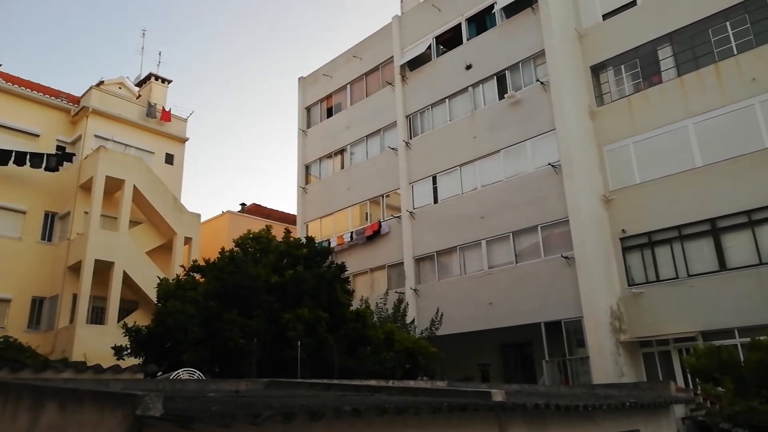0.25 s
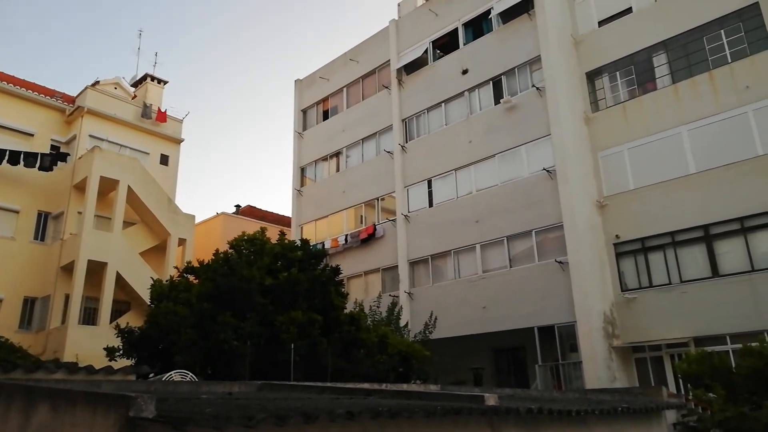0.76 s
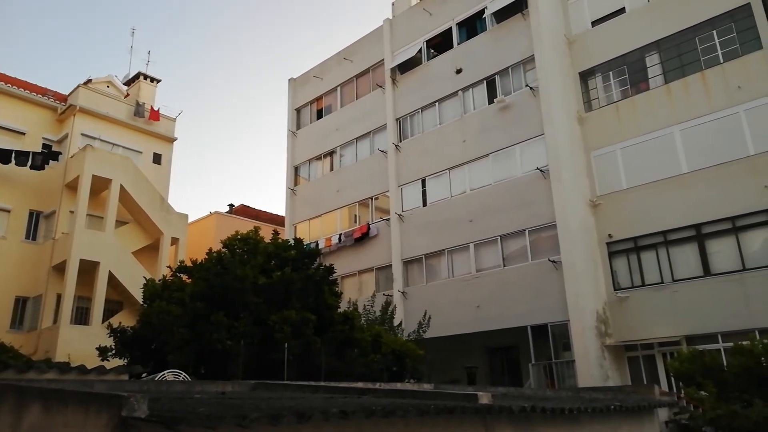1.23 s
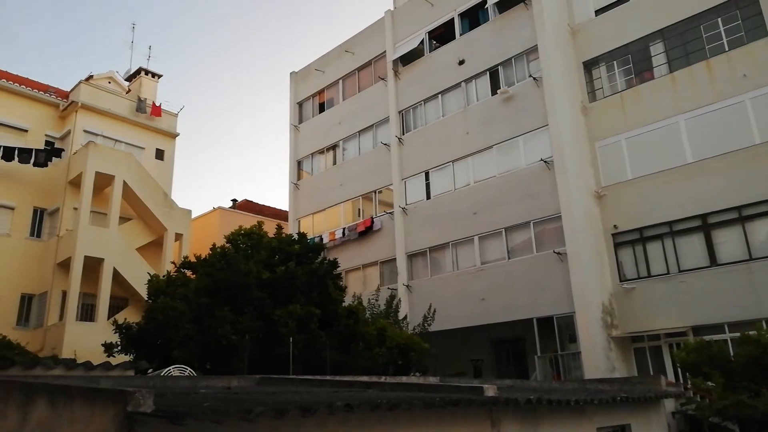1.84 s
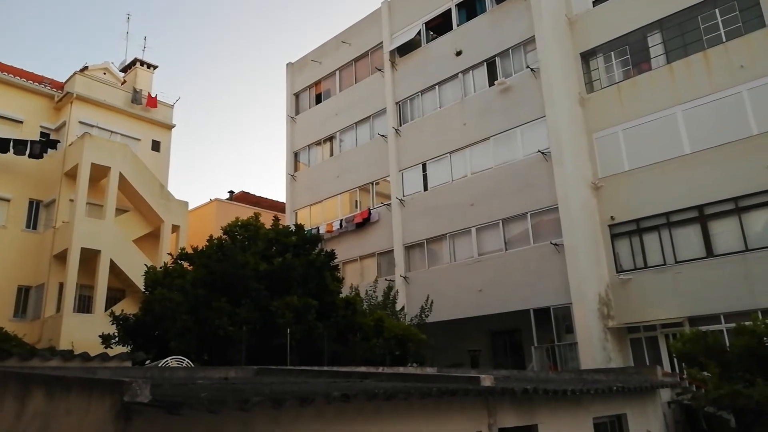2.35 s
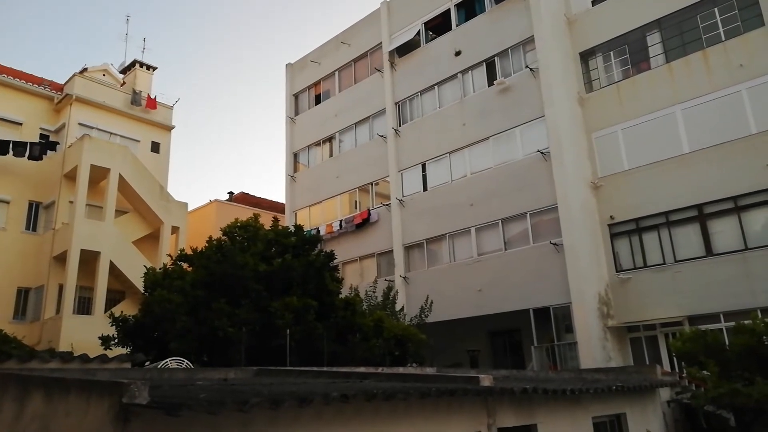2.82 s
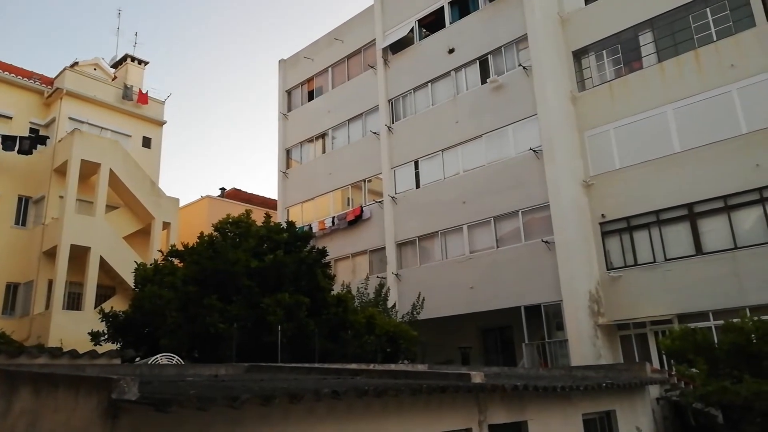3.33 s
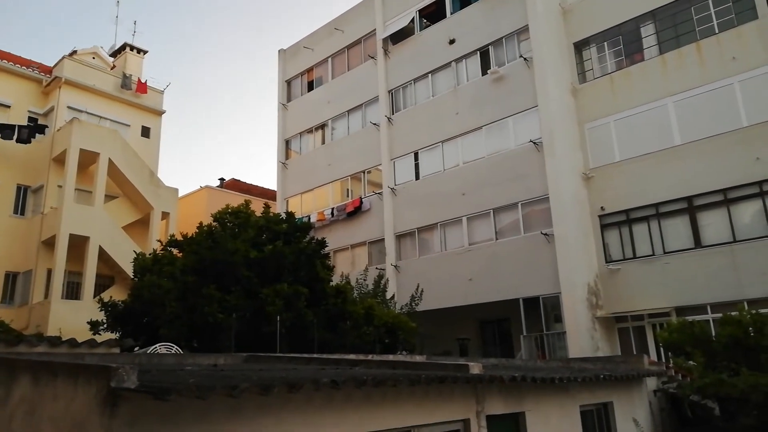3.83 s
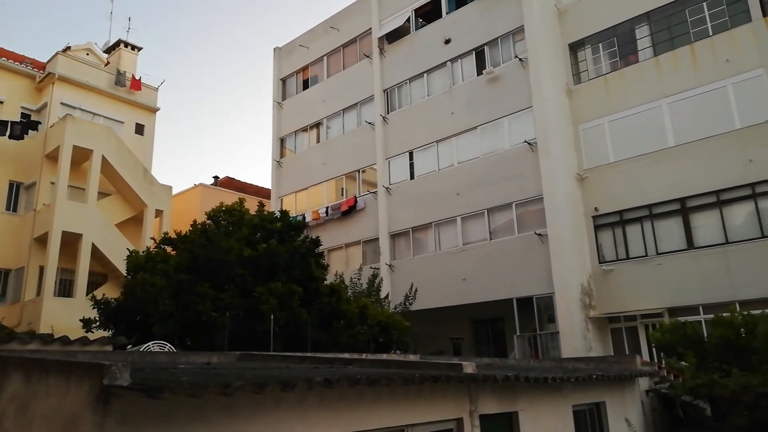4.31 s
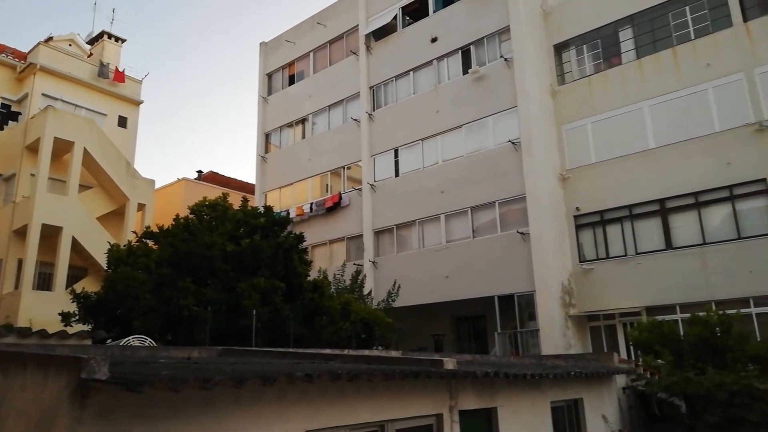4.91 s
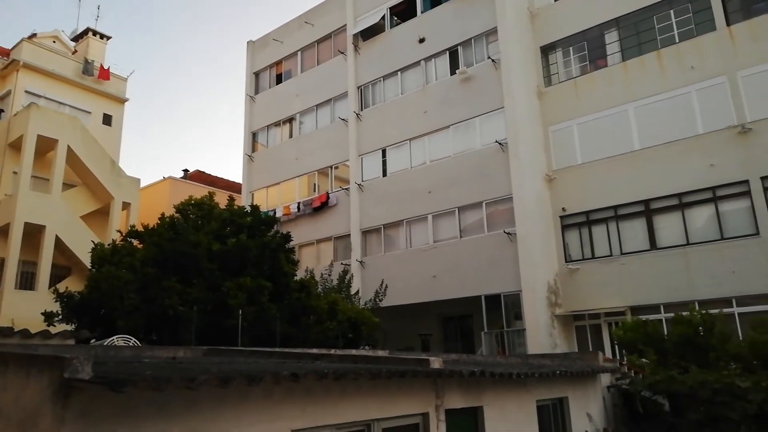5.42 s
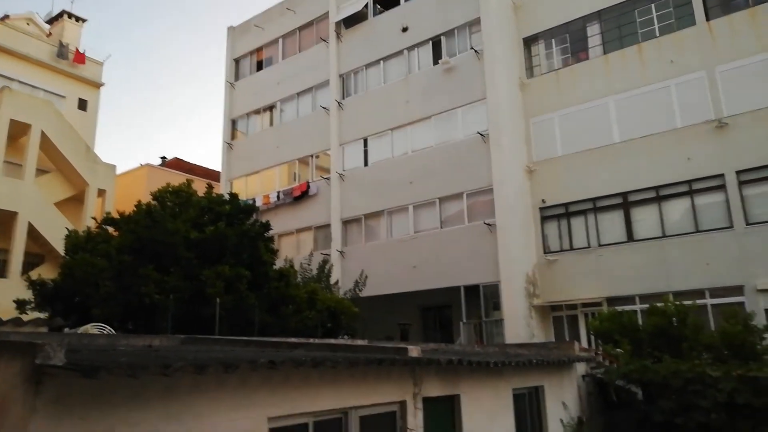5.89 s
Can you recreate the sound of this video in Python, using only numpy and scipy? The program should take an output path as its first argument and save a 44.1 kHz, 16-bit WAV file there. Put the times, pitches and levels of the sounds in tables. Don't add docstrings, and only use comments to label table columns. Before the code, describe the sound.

Sharp, short sparrow chirps ring around an echoing courtyard, with fainter birds blurred behind and a low steady traffic hum beneath.

```python
import sys
import numpy as np
from scipy import signal
from scipy.fft import rfft, irfft
from scipy.io import wavfile
from scipy.ndimage import uniform_filter1d

SR = 44100
rng = np.random.default_rng(int(sys.argv[2]) if len(sys.argv) > 2 else 0)


def rack_gain(trim_db):
    fader = np.asarray(trim_db, float)
    return 10 ** (fader / 20)


def wav_out(sig):
    wavfile.write(sys.argv[1], SR, np.round(np.clip(np.atleast_2d(sig).T, -1, 1) * 32767).astype(np.int16))


N = 271215


def at_hz(points, hz, column=1):
    points = np.array(points, float)
    return np.interp(np.log(hz + 1), np.log(points[:, 0]), points[:, column])


def band_pass(sound, low_hz, high_hz):
    return signal.sosfilt(signal.butter(2, [low_hz, high_hz], "band", fs=SR, output="sos"), sound)


def wander(count, rate_hz):
    r = np.exp(-2 * np.pi * rate_hz / SR)
    noise = rng.standard_normal(max(count, 12000) + 1000)
    slow = signal.lfilter([1], [1, -2 * r, r * r], noise)[1000:]
    return slow[:count] / slow.std()


def rasp(count, width_hz):
    low_pass = signal.butter(2, width_hz, fs=SR, output="sos")
    fast = signal.sosfilt(low_pass, rng.standard_normal(12000))[200:]
    return fast[:count] / fast.std()


def breath(count):
    return rasp(count, 3200) * np.sin(2 * np.pi * 9500 * np.arange(count) / SR)


def add(track, sound, start_s):
    i = round(start_s * SR)
    track[i:i + len(sound)] += sound[:max(N - i, 0)]


# pitch_hz, likeness (1 same, 0 unrelated)
LIKENESS = [(25, .998), (60, .995), (130, 0.98), (290, 0.78), (640, -0.55), (1400, .06), (3000, -0.05)]
# pitch_hz, left_minus_right_db
LEAN = [(200, 0), (500, -1.8), (1300, -1.3), (5000, -.5), (9000, 1.5), (15000, -.5)]


def ambience(spectrum, level_db, patchy_db):
    hz = np.fft.rfftfreq(N, 1 / SR)
    mid, side = rfft(rng.standard_normal((2, N))) * rack_gain(at_hz(spectrum, hz))
    alike = np.clip(at_hz(LIKENESS, hz), -1, 1)
    mid = mid * np.sqrt(1 + alike)
    side = side * np.sqrt(1 - alike)
    lean = rack_gain(at_hz(LEAN, hz) / 2)
    noise = irfft(np.array([(mid + side) * lean, (mid - side) / lean]), N)
    return rack_gain(level_db + patchy_db * wander(N, 4.1)) * noise / noise.mean(0).std()


# pitch_hz, level_db (per Hz)
RUMBLE = [(12, -50), (20, -16), (59, -1), (103, -0.5), (136, -2), (166, -9), (202, -3.5), (263, -12.5),
          (298, -11.5), (356, -14.5), (389, -10.5), (473, -17.5), (836, -18), (981, -18.5), (1400, -29.5),
          (1820, -64), (3080, -120)]


def city_rumble():
    return ambience(RUMBLE, level_db=-58.5, patchy_db=0.3)


# pitch_hz, level_db (per Hz)
AIR = [(710, -20), (1200, -7), (2220, -9.5), (2440, -8), (2880, -4), (3070, -6), (3450, 1), (4220, -2.5),
       (5380, -9.5), (6040, -12.5), (7470, -11.5), (8390, -13.5), (15000, -11.5)]


def distant_chorus():
    return ambience(AIR, level_db=-63.5, patchy_db=0.51)


def chirp(shape, tilt_db, wobble_hz, flutter_db):
    ms, hz, level_db, over_db = np.transpose(shape)
    t = np.arange(ms[0], ms[-1], 1000 / SR)
    count = len(t)
    path = np.interp(t, ms, hz)
    jump = uniform_filter1d(np.abs(np.gradient(path)) * SR / 1000, size=60)
    pitch = path + wobble_hz * wander(count, 230)
    phase = 2 * np.pi * np.cumsum(pitch) / SR
    overtones = np.zeros(count)
    for k, db in [(2, -3.5), (3, -3.0), (4, -18.0)]:
        overtones += rack_gain(db) * np.sin(k * phase) * (k * pitch < .4 * SR)
    overtones = overtones * (0.35 + rasp(count, 590)) + rack_gain(-1.0) * breath(count)
    choke = rack_gain(-np.minimum(0.012 * jump, 9.0))
    voice = np.sin(phase) * (1 + 0.38 * rasp(count, 560)) * choke
    voice *= rack_gain(tilt_db * (path - 4000) / 1000)
    voice += rack_gain(np.interp(t, ms, over_db)) * overtones
    voice *= np.minimum((t - ms[0]) / 7, 1) ** 2
    return voice * rack_gain(np.interp(t, ms, level_db) + flutter_db * wander(count, 86))


def bird(calls, shapes, wobble_hz=120, flutter_db=3.0):
    track = np.zeros(N)
    for start_s, level_db, tilt_db in calls:
        for shape in shapes:
            sound = rack_gain(level_db) * chirp(shape, tilt_db, wobble_hz, flutter_db)
            add(track, sound, start_s + shape[0][0] / 1000)
    return track


def stair(top_hz, first_ms, note_ms, slide_ms, loss_db, count=4):
    starts = [0] + [first_ms + slide_ms + k * note_ms for k in range(count - 1)]
    held_ms = note_ms - slide_ms
    holds = [first_ms] + [held_ms] * (count - 2) + [held_ms / 2]
    levels = [-4] + [-loss_db * k ** 2 for k in range(count - 1)]
    pitches = [top_hz * .826 ** k for k in range(count)]
    return [(ms, max(hold, 1), hz, db) for ms, hold, hz, db in zip(starts, holds, pitches, levels)]


def notes(pitches, rows):
    return [(ms, hold, hz, db) for hz, (ms, hold, db) in zip(pitches, rows)]


def phrase(held, over_db, over_db_per_ms, scoop=1.08, sag=.86, attack_ms=6.0, release_ms=31.4):
    rows = [(ms + end, hz, db) for ms, hold, hz, db in held for end in (0, hold)]
    ms, hz, db = rows[0]
    last_ms, last_hz, last_db = rows[-1]
    start = (ms - attack_ms, hz * scoop, db + 1)
    finish = (last_ms + release_ms, last_hz * sag, last_db - 28)
    return [(ms, hz, db, over_db + over_db_per_ms * ms) for ms, hz, db in [start] + rows + [finish]]


# delay_ms, left_db, right_db
ECHOES = [
    (9.156, 3, -21),
    (21.5, -1, -17),
    (34.86, -28, -1.5),
    (46, -6, -23),
    (59.5, -7, -28),
    (78.8, -36, -42),
    (91.5, -28, -6.5),
]
# pitch_hz, fade_s
YARD_FADE = [(2000, 0.57), (4000, 0.67), (7000, 0.53), (11000, 0.37), (15000, 0.038)]


def yard(track, direct_db, left_lag, echoes, tail_db, build_s):
    t = np.arange(SR * 3 // 4) / SR
    edges = np.geomspace(1000, 16000, 9)
    tail = 0
    for low, high in zip(edges, edges[1:]):
        band = band_pass(rng.standard_normal((2, len(t))), low, high)
        fade_s = at_hz(YARD_FADE, np.sqrt(low * high))
        tail = tail + band * rack_gain(-60 * (t / fade_s) ** 1.126)
    response = rack_gain(tail_db) * tail * (1 - np.exp(-(t / build_s) ** 2))
    response += rack_gain(-19.0 - 60 * t / 0.041) * rng.standard_normal(tail.shape)
    lags = [max(left_lag, 0), max(-left_lag, 0)]
    for side in range(2):
        response[side, round(lags[side])] += rack_gain(direct_db[side])
        for ms, *level_db in echoes:
            taps = round(ms * SR / 1000) + rng.integers(0, 60, 3)
            response[side, taps] += rack_gain(level_db[side] - 7.0) * rng.choice([-1, 1], 3)
    return signal.fftconvolve(track[None], response, axes=1)[:, :N]


# start_s, level_db, tilt_db (per kHz of pitch)
LED_CALLS = [
    (2.0095, -32, 1.8),
    (2.735, -33.5, 0),
    (4.101, -32, 3),
    (5.404, -33.5, 5),
]
# start_s, level_db, tilt_db (per kHz of pitch)
PLAIN_CALLS = [
    (.104, -34.5, 2.6),
    (1.437, -33.5, 5.5),
    (3.289, -38, 1),
    (4.766, -36, 4),
    (6.14, -42, -8),
]
# start_s, level_db, tilt_db (per kHz of pitch)
GLIDING_CALLS = [
    (.817, -32.5, 1.9),
]
# start_ms, hold_ms, level_db
LEAD_IN = [
    (-22, 3.0, -23),
    (-12, 6.0, -14),
]
LEAD_IN_HZ = [6100, 6170]


def loudest_bird():
    top_hz = 4770
    lead = phrase(notes(LEAD_IN_HZ, LEAD_IN), -7, 0.24, scoop=0.89, sag=1.1, attack_ms=15, release_ms=15.2)
    stepped = phrase(stair(top_hz, 13, 24, 4.85, 2.3), -10.5, -0.18)
    gliding = phrase(stair(1.04 * top_hz, 6.0, 27, 21.04, 1.2), -7, -0.28)
    plain = phrase(stair(1.01 * top_hz, 13, 25, 8.0, 1.6), -12, -0.16, scoop=0.99, attack_ms=8.0)
    track = bird(LED_CALLS, [lead, stepped])
    track += bird(GLIDING_CALLS, [lead, gliding])
    track += bird(PLAIN_CALLS, [plain])
    return yard(track, (0.0, -2.5), 17, ECHOES, tail_db=-24.5, build_s=0.035)


# start_s, level_db, pitch_factor, stretch_factor
CHEEPS = [
    (0.238, -44.5, .99, 0.91),
    (1.19, -56.5, 1.02, 1.4),
    (2.44, -40.5, .99, 1.28),
    (3.075, -46.5, 1.02, 1.5),
    (3.545, -47.5, .99, 0.87),
    (5.531, -44, 1, 1.7),
]
# delay_s, start_hz, end_hz, length_s, level_db
STRANDS = [
    (0.00065, 7650, 8400, .08, -6),
    (.033, 5800, 6350, .08, 2.5),
    (0.08, 4800, 4700, 0.128, -4),
    (.042, 8400, 9500, .13, -16.5),
    (0.045, 16000, 7300, 0.043, -18.5),
    (.035, 13500, 14000, .12, -9),
]
# start_s, start_hz, length_s, level_db
FALLS = [(1.227, 3280, .13, -46.5), (2.146, 2776, 0.078, -37.5), (2.861, 4000, 0.099, -33.5),
         (3.381, 4515, 0.11, -37.5), (3.40, 3290, .11, -40.5), (3.72, 4500, 0.051, -42),
         (3.904, 4075, 0.085, -46), (4.332, 4500, 0.13, -37), (4.96, 5050, .09, -40),
         (5.61, 3300, 0.059, -41.5)]
# start_s, start_hz, length_s, level_db
HOLDS = [(.301, 4280, 0.14, -43.5), (0.4, 4500, 0.096, -44), (0.43, 2685, 0.088, -41),
         (.599, 4310, 0.26, -58), (1.21, 4400, 0.083, -51), (1.85, 6500, .1, -55),
         (1.87, 4820, 0.18, -46.5), (1.926, 8750, 0.073, -53), (1.93, 12400, .1, -58),
         (2.5, 5960, 0.17, -42), (3.2, 4650, 0.043, -65), (3.157, 4500, 0.02, -38),
         (3.565, 11300, 0.081, -55), (3.597, 8750, 0.15, -55), (3.857, 2780, 0.058, -44),
         (5.4, 9700, 0.16, -53), (5.03, 2340, 0.104, -43), (5.55, 11700, 0.14, -55),
         (5.6, 2380, 0.076, -50.5), (5.70, 3505, 0.064, -45.5), (5.705, 2600, 0.03, -53)]
# start_s, start_hz, length_s, level_db
RISES = [
    (1.272, 1550, .078, -59),
    (3.932, 1552, .074, -52),
    (5.694, 1558, .057, -47),
]


def far_calls():
    rows = []
    for s, db, factor, stretch in CHEEPS:
        for delay, start_hz, end_hz, length, level_db in STRANDS:
            rows.append((s + delay, factor * start_hz, factor * end_hz, stretch * length, db + level_db))
    for calls, end_over_start in [(FALLS, .77), (HOLDS, .96), (RISES, 1.25)]:
        rows += [(s, hz, end_over_start * hz, length, db) for s, hz, length, db in calls]
    return rows


def far_birds():
    track = np.zeros(N)
    for start_s, start_hz, end_hz, length_s, level_db in far_calls():
        wobble_hz = .052 * start_hz
        u = np.linspace(0, 1, round(min(length_s, .26) * SR))
        pitch = start_hz + (end_hz - start_hz) * u + wobble_hz * wander(len(u), 105)
        voice = np.sin(2 * np.pi * np.cumsum(pitch) / SR) * (1 + 0.45 * rasp(len(u), 4.2 * wobble_hz))
        voice += rack_gain(-23.5) * breath(len(u))
        swell = np.abs(np.sin(np.pi * u ** 0.54)) ** 0.56
        add(track, rack_gain(level_db) * swell * voice, start_s)
    return yard(track, (-9.0, -9.0), 12.8, [], tail_db=-30.5, build_s=0.022)


# start_s, level_db, tilt_db (per kHz of pitch)
SECOND_CALLS = [
    (1.65, -35, -1.2),
    (2.23, -34, -1.1),
    (3.0105, -33.5, -2.5),
    (4.238, -30, -0.64),
    (5.023, -32, 0.29),
    (5.766, -33, -0.1),
]
# start_ms, hold_ms, level_db
DIP = [
    (-2.5, 8.0, -6),
    (26, 14.83, -3),
    (48.5, 3.1, -4),
    (61, 13.9, -4.5),
    (84.5, 8.4, -8),
]
DIP_HZ = [5380, 3760, 4330, 3180, 2780]


def second_bird():
    dip = phrase(notes(DIP_HZ, DIP), -16.5, -0.12, scoop=0.94, attack_ms=9.0)
    track = bird(SECOND_CALLS, [dip], wobble_hz=151)
    return yard(track, (-3.0, -1.5), -2.5, ECHOES[::2], tail_db=-32, build_s=0.013)


# start_s, level_db, tilt_db (per kHz of pitch)
THIRD_CALLS = [
    (3.6, -36, .6),
]
# start_ms, hold_ms, level_db
RISE = [
    (2.0, 10.5, -1),
    (16, 18, -5),
]
RISE_HZ = [4260, 4700]
# start_ms, hold_ms, level_db
ANSWER = [
    (58.2, 8, -1),
]
ANSWER_HZ = [3220]


def third_bird():
    rise = phrase(notes(RISE_HZ, RISE), -20, -0.34, scoop=0.77, sag=1.0, attack_ms=12.0, release_ms=9.8)
    answer = phrase(notes(ANSWER_HZ, ANSWER), -19, .001, scoop=.97, sag=0.89, release_ms=3.4)
    track = bird(THIRD_CALLS, [rise, answer], wobble_hz=109)
    return yard(track, (-4.0, 0.0), 4, ECHOES[1::3], tail_db=-26.5, build_s=0.0059)


# start_s, peak_db
TICKS = [
    (3.876, -37.5),
]


def tick():
    track = np.zeros(N)
    for start_s, peak_db in TICKS:
        track[round(start_s * SR)] = rack_gain(peak_db + 16)
    return band_pass(track + 1e-18, 8800, 11500) * rack_gain(np.array([[0.0], [-14.0]]))


# pitch_hz, left_db, right_db
PORTS = [(2160, -18.5, -16.5), (3046, -7, -5), (5540, -7, -7), (6500, -9.5, -13), (8540, -8.5, -11),
         (10320, 2, -6), (12400, -3.5, 0), (14000, -17.5, -17)]


def ports(x):
    hz = np.fft.rfftfreq(N, 1 / SR)
    gains = rack_gain(np.array([at_hz(PORTS, hz, column=c) for c in (1, 2)]))
    return irfft(rfft(x) * gains, N)


def scene():
    birds = loudest_bird() + far_birds() + second_bird() + third_bird()
    return city_rumble() + distant_chorus() + ports(birds) + tick()


def band_limit(x):
    return signal.sosfilt(signal.butter(12, 15650, fs=SR, output="sos"), x)


def record(dry):
    soft = signal.sosfilt(signal.butter(2, 13000, fs=SR, output="sos"), dry)
    return band_limit(soft)


dry = scene()
out = record(dry)
wav_out(out)
```